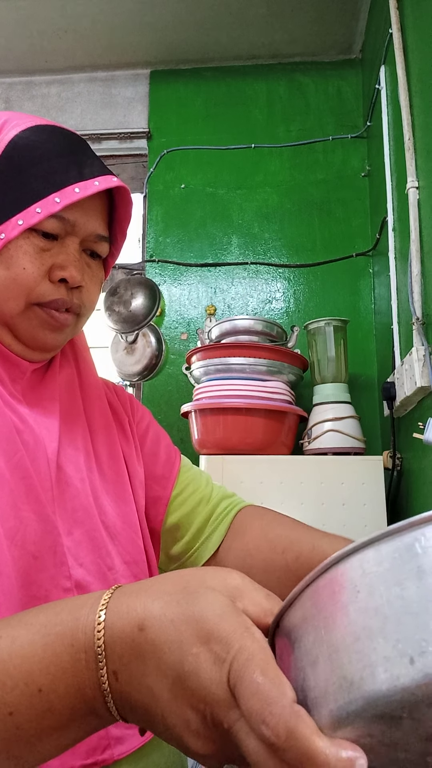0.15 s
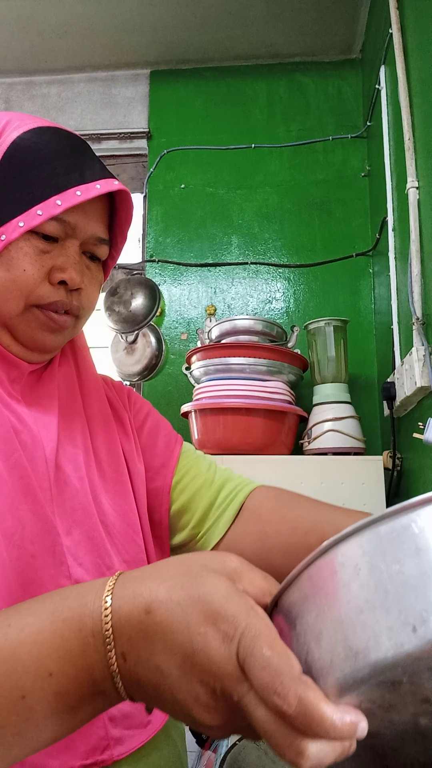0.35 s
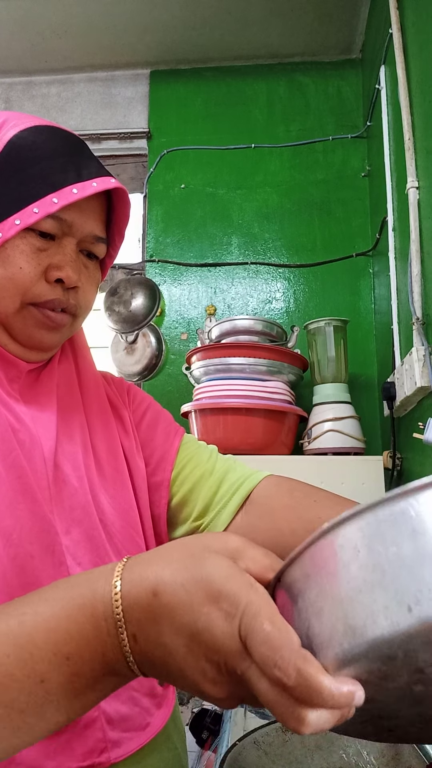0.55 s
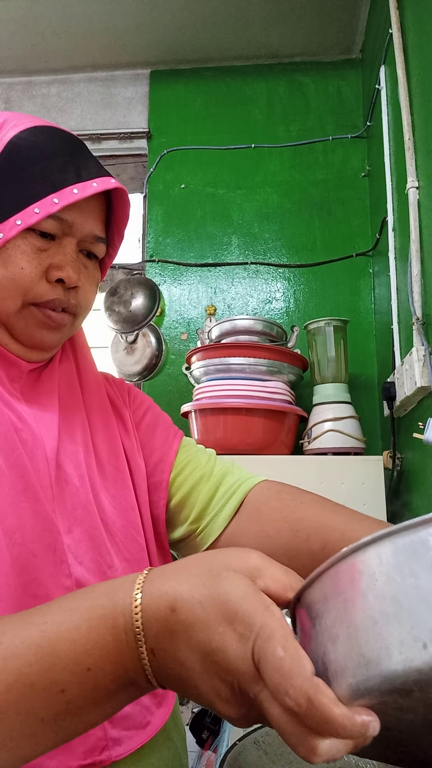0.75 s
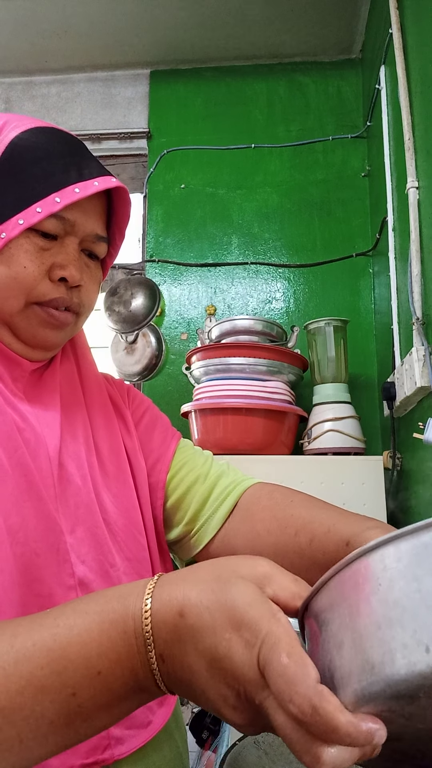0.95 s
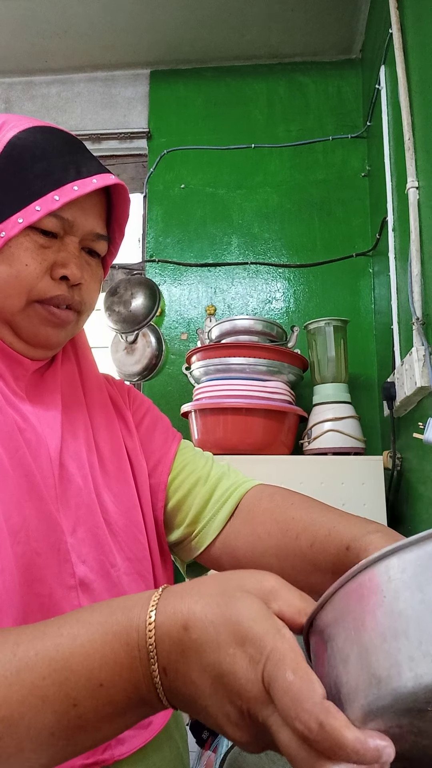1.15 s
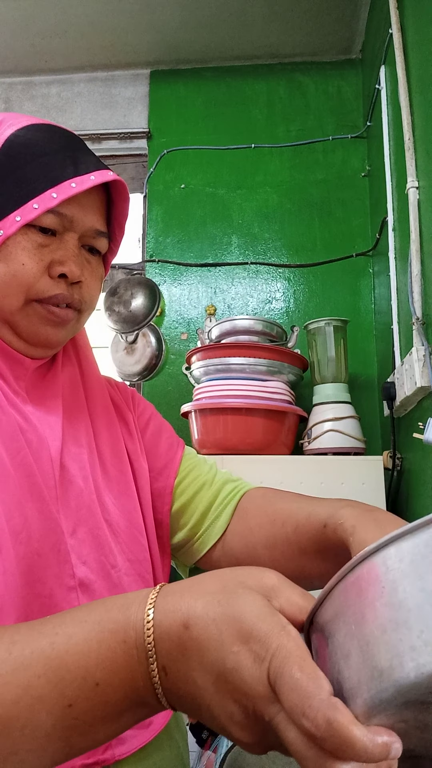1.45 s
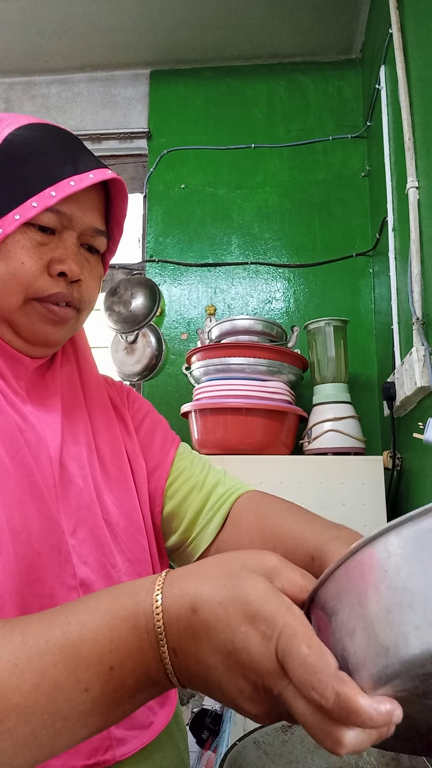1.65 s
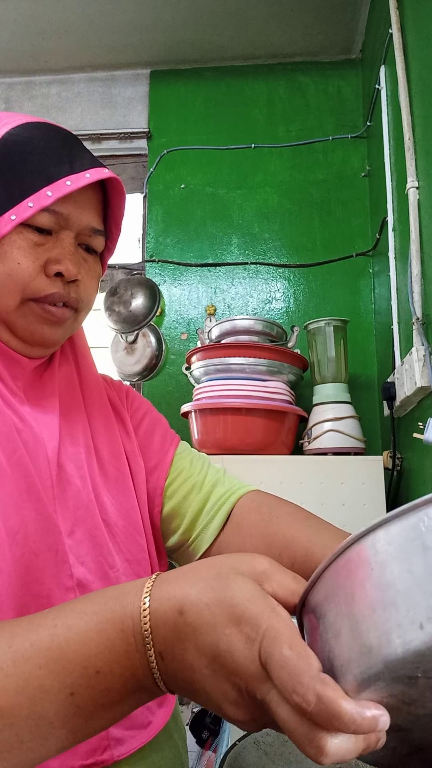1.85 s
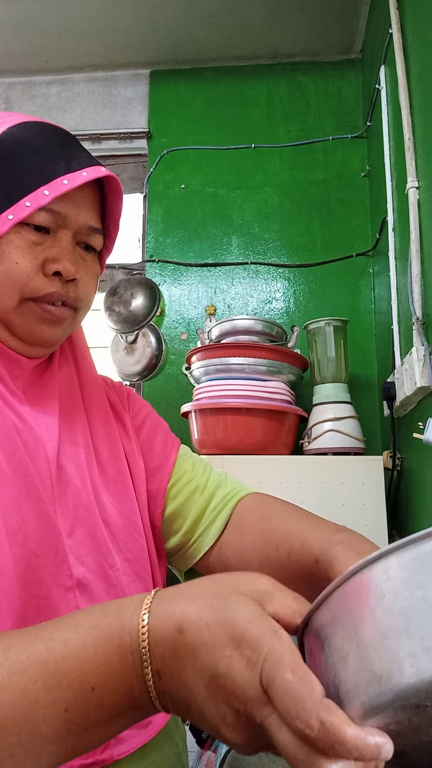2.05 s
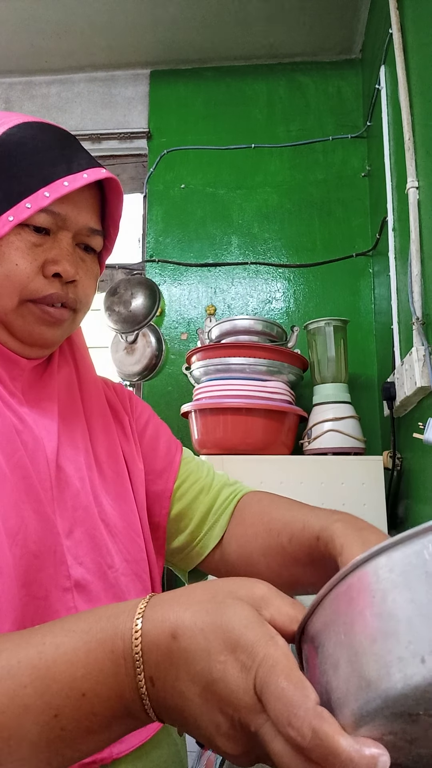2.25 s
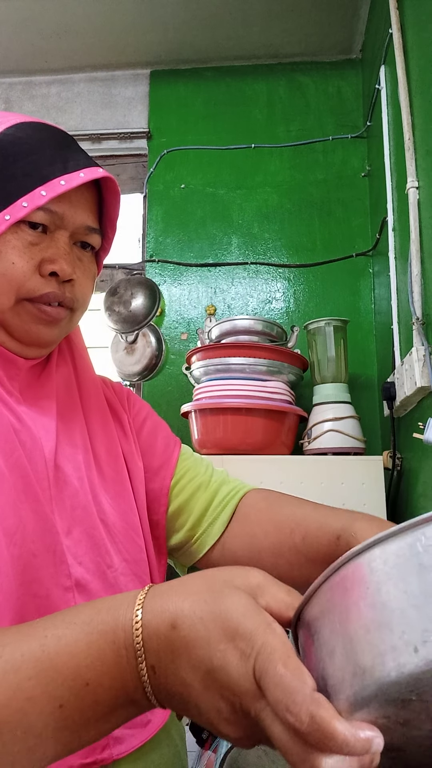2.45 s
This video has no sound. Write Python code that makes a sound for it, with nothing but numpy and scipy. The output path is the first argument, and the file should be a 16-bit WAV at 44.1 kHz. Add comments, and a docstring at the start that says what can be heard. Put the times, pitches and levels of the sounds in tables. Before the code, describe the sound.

Hard little shells rattle and grind against a thin metal bowl, stirred in strokes, indoors

```python
"""A hand stirs snail shells round a metal basin in a small, hard-walled kitchen, over a steady faint noise floor.
First shells tumble and click, with knocks on the wall, as a short stroke scrapes by; then it grows quiet.
From half a second on, the heap scrapes in strokes (gritty contacts) and sets the bottom droning (a narrow mode),
while shells tumble (noise bursts), click (cracks and hollow rings) and knock on the wall (basin modes).
Near the end the tumbling swells and the clicks crowd together, then the level falls."""
import sys
import numpy as np
from scipy import signal
from scipy.fft import rfft, irfft, next_fast_len
from scipy.io import wavfile
from scipy.ndimage import uniform_filter1d, map_coordinates

SR = 44100
rng = np.random.default_rng(int(sys.argv[2]) if len(sys.argv) > 2 else 0)


def wav_record(signal):
    """Record a signal, one row per channel, as 16-bit PCM in the file named by sys.argv[1]."""
    frames = np.transpose(np.atleast_2d(signal))
    bounded = np.clip(frames, -1, 1)
    # unit amplitude maps onto the largest positive 16-bit level
    quanta = np.round(bounded * 32767).astype(np.int16)
    wavfile.write(sys.argv[1], SR, quanta)


N = 114660
T = np.arange(N) / SR


def amp(db):
    """Decibel law: a level as an amplitude ratio."""
    return 10 ** (np.asarray(db) / 20)


def unit(x):
    """Normalisation: scale to an rms of 1."""
    return x / np.sqrt(np.mean(x ** 2) + 1e-20)


def decay(t, t60):
    """Exponential decay: 60 dB lost in t60 seconds."""
    return amp(-60 * t / t60)


def along(points, hz):
    """Logarithmic frequency scale: interpolate (frequency [Hz], value) points."""
    f, v = np.transpose(points)
    return np.interp(np.log(hz + 1), np.log(f + 1), v)


def level(rows):
    """Amplitude envelope: gain per sample from (time [s], level [dB]) rows."""
    return amp(np.interp(T, *np.transpose(rows)))


def wobble(rate):
    """Slow random modulation: a smooth curve with rate knots a second."""
    return map_coordinates(rng.standard_normal(4000), [T * rate], mode="wrap")


def filtered(x, response):
    """Linear filtering: multiply the spectrum by a response of frequency."""
    m = next_fast_len(N + SR // 2)
    return irfft(rfft(x, m) * response(np.fft.rfftfreq(m, 1 / SR)), m)[..., :N]


def coloured(x, points):
    """Minimum-phase filtering: colour x causally by (frequency [Hz], level [dB]) points, to rms 1."""
    def response(hz):
        cepstrum = irfft(np.log(amp(along(points, hz))))
        half = len(cepstrum) // 2
        cepstrum[1:half] *= 2  # fold negative times onto positive ones
        cepstrum[half + 1:] = 0
        return np.exp(rfft(cepstrum))
    return unit(filtered(x, response))


# likeness of the two channels: (frequency [Hz], correlation [0-1])
CHANNEL_LIKENESS = [(60, 1), (300, 1), (700, 0.2), (1300, 0.38), (2500, 0.028), (5000, 0.026),
                    (12000, 0.0073)]


def spread(pair):
    """Interchannel coherence: two unrelated signals become left and right, alike in the bass."""
    def mid_side_gains(hz):
        turn = np.arccos(np.clip(along(CHANNEL_LIKENESS, hz), -1, 1)) / 2
        return np.array([np.cos(turn), np.sin(turn)])
    mid, side = filtered(pair, mid_side_gains)
    return unit(np.array([mid + side, mid - side]))


def noise(points):
    """Random noise: coloured, stereo and of rms 1."""
    return spread(coloured(rng.standard_normal((2, N)), points))


def excerpt(sound, length):
    """Stationarity: a stretch of steady noise from a random moment."""
    return np.roll(sound, rng.integers(N), axis=1)[:, :length]


def add(out, s, x):
    """Superposition: mix x into out at time s."""
    i = max(0, round(s * SR))
    out[:, i:i + x.shape[-1]] += x[..., :max(0, N - i)]


def contacts(per_s, scatter_db, t60):
    """Random impact process: tiny gritty contacts at random moments, of clipped log-normal size."""
    size = amp(scatter_db * np.clip(rng.standard_normal(N), -2, 1.7))
    hits = (rng.random(N) < per_s / SR) * size
    energy = signal.lfilter([1], [1, -amp(-120 / (t60 * SR))], hits ** 2)
    return np.sqrt(energy) * rng.standard_normal((2, N))


# strength of the stirring: (time [s], level [dB])
STIRRING = [(0, -43.5), (.06, -47), (.1, -38.5), (.17, -29.5), (.245, -39), (.46, -50), (.51, -40.5),
            (.565, -31), (.66, -29), (.76, -34), (.84, -30.5), (.895, -33.5), (.918, -44.5), (.955, -33),
            (1.2, -30), (1.29, -32.5), (1.325, -37.5), (1.42, -38), (1.5, -32.5), (1.6, -38.5), (1.65, -32),
            (1.725, -37), (1.755, -26), (1.85, -27), (1.93, -38.5), (2.02, -34.5), (2.08, -29),
            (2.16, -31.5), (2.215, -38), (2.25, -33), (2.37, -32.5), (2.47, -34.5), (2.6, -41.5)]
# colour of the scraping: (frequency [Hz], level [dB])
SCRAPE_COLOUR = [(220, -24), (380, -20), (579, -6.5), (687, -2), (939, -7.5), (1220, -14), (1500, -3.5),
                 (1700, 1), (2930, -2.5), (3220, -5), (5910, 0.5), (6600, -6.5), (8340, -17.5),
                 (11700, -12), (15800, -31)]
SCRAPES_PER_S, SCRAPE_T60_S, SCRAPE_SCATTER_DB = 2400, .0025, 5
CLUMP_DB, CLUMP_KNOTS_PER_S = 1.5, 70
GRIT_DB, SING_DB, TAP_DB = 2, -2, -2.5  # shares of the scraping


def scraping():
    """Friction as many small impacts: the heap slides in clumps, shells tap and the basin sings along."""
    clumps = amp(CLUMP_DB * wobble(CLUMP_KNOTS_PER_S))
    force = spread(contacts(SCRAPES_PER_S, SCRAPE_SCATTER_DB, SCRAPE_T60_S) * clumps)
    bass_cut = lambda hz: 1 / (1 + (260 / (hz + 1)) ** 4)
    grit = filtered(coloured(force, SCRAPE_COLOUR), bass_cut)
    return level(STIRRING) * (amp(GRIT_DB) * grit + amp(SING_DB) * basin(force) + amp(TAP_DB) * taps())


# modes of the loaded basin, also rung by the knocks: (frequency [Hz], level [dB], t60 [s])
BASIN_MODES = [(530, -9.5, .15), (697, -18, 0.23), (1230, 1.5, 0.07), (1282, -5.5, 0.14), (1412, 5, 0.017),
               (1661, -2, 0.12), (1728, -1, 0.044), (1838, -12, 0.21), (2113, -6.5, .15),
               (3645, -2.5, 0.057), (6350, 8.5, 0.05), (6800, 6.5, 0.043)]


def basin(force):
    """Modal resonance: the basin's modes answer a force, each a damped oscillator."""
    def response(f):
        total = 0
        for hz, db, t60 in BASIN_MODES:
            width_hz = np.log(1000) / np.pi / t60
            total = total + amp(db) * np.sqrt(t60) * 1j * f / t60 / (hz * hz - f * f + 1j * f * width_hz)
        return total
    return unit(filtered(force, response))


# colour of the small taps: (frequency [Hz], level [dB])
TAP_COLOUR = [(100, -41), (300, -20), (700, -9.5), (1250, 4), (2000, -4.5), (3000, 3.5), (5000, 2.5),
              (6700, 8.5), (7700, -27), (12000, 1)]
TAPS_PER_S, TAP_HZ, TAP_OCTAVES = 520, 3243, 1.75  # centre pitch, spread to either side
TAP_CYCLES = 48  # cycles for a tap to fall by 60 dB


def taps():
    """Constant-Q decay: single shells tap as they roll, each dying in the same number of cycles."""
    count, t = int(TAPS_PER_S * N / SR), T[:900]
    u = rng.random((count, 4))
    hz = np.clip(TAP_HZ * 2 ** (TAP_OCTAVES * (2 * u[:, :1] - 1)), 300, 15000)
    size = amp(4.5 * np.minimum(-np.log(1 - u[:, 1:2]), 2.6))
    fade = size * decay(t * hz, TAP_CYCLES) * np.sqrt(hz)
    at = (u[:, 2:3] * N).astype(int) + np.arange(len(t))
    lag = (u[:, 3:] - .5) * .0004  # s, opposite in the two channels
    channels = []
    for side in (1, -1):
        tones = fade * np.sin(2 * np.pi * hz * (t + side * lag))
        channels.append(np.bincount(at.ravel(), tones.ravel(), N)[:N])
    return coloured(np.array(channels), TAP_COLOUR)


# ring of the basin's bottom under the heap: (time [s], level [dB])
BOTTOM_RING = [(.5, -69), (.6, -39), (.76, -39.5), (.87, -46), (.96, -43), (1.12, -45.5), (1.2, -38.5),
               (1.3, -38), (1.35, -47), (1.45, -40.5), (1.53, -49.5), (1.71, -60), (1.84, -37.5),
               (1.89, -45.5), (2.11, -37), (2.23, -34.5), (2.31, -48), (2.37, -36), (2.44, -53.5),
               (2.6, -59)]
DRONE_HZ, DRONE_WIDTH_HZ, DRONE_DB = 292.2, 7.4, -2


def drone():
    """Narrow-band resonance: rubbing feeds the lowest mode of the bottom; its swells are evened out."""
    def response(f):
        mode = 1j * f * DRONE_WIDTH_HZ / (DRONE_HZ ** 2 - f * f + 1j * f * DRONE_WIDTH_HZ)
        return mode / (1 + (f / 600) ** 4)
    ring = filtered(rng.standard_normal(N), response)
    power = np.abs(uniform_filter1d(ring ** 2, size=2200))  # mean over 50 ms
    steady = ring / np.sqrt(power + 1e-12)
    return amp(DRONE_DB) * level(BOTTOM_RING) * steady


# shells tumbling over each other: (time [s], level [dB])
TUMBLING = [(0, -41), (.06, -73), (.12, -44), (.135, -26.5), (.19, -26.5), (.24, -49), (.45, -68),
            (.6, -35), (.92, -45), (1.1, -31.5), (1.32, -38), (1.36, -30.5), (1.42, -26.5), (1.56, -28.5),
            (1.7, -36.5), (1.8, -28.5), (1.94, -44), (2.14, -28), (2.22, -31), (2.33, -21.5), (2.39, -23),
            (2.44, -48), (2.6, -33)]
# colour of tumbling shells: (frequency [Hz], level [dB])
RATTLE_COLOUR = [(100, -68), (500, -31), (1500, -14), (2800, -8), (3700, -7.5), (5500, -7), (6900, 0),
                 (7700, -18.5), (9500, -10.5), (12500, -12), (15800, -12.5)]


def tumbling():
    """Random impact process: loose shells rattle on each other."""
    rattle = contacts(per_s=400, scatter_db=4, t60=.009)
    return level(TUMBLING) * coloured(spread(rattle), RATTLE_COLOUR)


# shell on shell: (time [s], level [dB], pitch [Hz], treble [dB])
SHELL_CLICKS = [(.002, -27, 4250, -7.5), (.071, -19.5, 4360, 5), (.0813, -23.5, 4200, 5),
                (.1045, -26, 4200, 8), (.125, -9, 3640, 7.5), (.137, -20, 3670, -8), (.157, -18, 3800, -7),
                (.179, -16, 6900, 1.5), (.2603, -13, 4310, -6), (.2622, -15, 4810, -9.5),
                (0.271, -26, 3900, -6), (.302, -24, 3700, -3), (.289, -20, 3740, 8), (.485, -32.5, 5520, 3),
                (.497, -32.5, 6440, -10.5), (.51, -34, 6360, 10), (.534, -32, 6340, 6),
                (.635, -23.5, 6730, -2), (.789, -27, 6300, -2), (.819, -22, 6400, 5), (.949, -29, 5660, 2),
                (1.002, -22, 5360, 5), (1.033, -32, 6600, 1), (1.088, -22, 5400, 9.5),
                (1.15, -20.5, 5730, -1.5), (1.3312, -20, 6100, -0.5), (1.358, -16.5, 5160, -3.5),
                (1.394, -24.5, 5500, 6), (1.373, -23, 5270, -2), (1.419, -22.5, 4300, -6),
                (1.4344, -9.5, 6520, 2), (1.476, -17, 5400, 10), (1.506, -25.5, 6960, 15.5),
                (1.5475, -16, 4500, 8), (1.579, -22, 6940, 9), (1.609, -11, 4650, -4.5),
                (1.641, -18, 4680, 4), (1.785, -18.5, 6660, 2), (1.842, -18, 6080, -2),
                (2.057, -19.5, 5400, 1), (2.1505, -16, 6410, 2), (2.1952, -13, 5800, 2.5),
                (2.257, -14.5, 6590, 3.5), (2.313, -9, 5950, 1), (2.336, -13, 6630, 4),
                (2.348, -14, 6000, 6), (2.368, -14, 4220, 0), (2.396, -15, 6550, 4),
                (2.425, -12, 4790, -4.5), (2.4338, -11.5, 4740, -1.5), (2.473, -29, 6150, 11.5),
                (2.5132, -12, 4230, 3.5), (2.519, -13, 4500, 4)]
# modes of a shell: (ratio to the pitch, level [dB])
SHELL_PARTIALS = [(0.832, -8), (0.996, -1.5), (1.098, -7.5)]
# crack of a click: (frequency [Hz], level [dB])
CRACK_COLOUR = [(100, -54), (300, -36), (1300, -29), (3500, -2), (5000, 3.5), (6900, 4.5), (7700, -11),
                (16000, -47)]
# brittle top of a click: (frequency [Hz], level [dB])
SNAP_COLOUR = [(3000, -39), (6500, -13), (8000, -9), (11000, -0.5), (13000, 1.5), (16000, -9.5)]
# the basin's answer to a click: (frequency [Hz], level [dB])
ANSWER_COLOUR = [(2800, -74), (3300, 16), (3650, 21.5), (4100, 18), (4700, -3), (6000, -48), (6900, -19),
                 (7500, 0.5)]
RING_DB, CRACK_DB, SNAP_DB, ANSWER_DB = -2.5, -7, -14, -15
SHELL_T60_S, CRACK_T60_S, ANSWER_T60_S = 0.0053, 0.026, 0.14
SPIKE_DB, SPIKE_T60_S = 7.5, 0.00099  # first contact
HOLLOW = 0.94  # dB more ring for each dB less treble: whole shells ring, broken ones snap
CHATTER_S, CHATTER_HZ = 0.002, 4900  # chatter of a shell of this pitch; smaller shells chatter longer


def clicks():
    """Impact and free decay: shells chatter with crack, brittle top and hollow ring; the basin answers."""
    out, t = np.zeros((2, N)), T[:SR // 5]
    crack, snap, answer = noise(CRACK_COLOUR), noise(SNAP_COLOUR), noise(ANSWER_COLOUR)
    for s, db, hz, treble_db in SHELL_CLICKS:
        own = (round(s * SR) + np.arange(len(t))) % N
        free = np.maximum(t - CHATTER_S * (hz / CHATTER_HZ) ** 2, 0)  # decay waits for the chatter
        ring = 0
        for ratio, mode_db in SHELL_PARTIALS:
            mode_hz = hz * ratio * (1 + 0.021 * rng.standard_normal())
            ring = ring + amp(mode_db) * np.sin(2 * np.pi * (mode_hz * t + rng.random((2, 1))))
        ring = amp(RING_DB - HOLLOW * treble_db) * decay(free, SHELL_T60_S) * ring
        grit = amp(CRACK_DB) * crack[:, own] + amp(SNAP_DB + treble_db) * snap[:, own]
        grit = grit * (decay(free, CRACK_T60_S) + amp(SPIKE_DB) * decay(t, SPIKE_T60_S))
        tail = amp(ANSWER_DB) * decay(t, ANSWER_T60_S) * excerpt(answer, len(t))
        add(out, s, amp(db) * (grit + ring + tail))
    return out


# shells on the wall: (time [s], level [dB], pitch of the struck spot [Hz], ring of the whole basin [dB])
WALL_KNOCKS = [(0.081, -23.5, 1240, -5.5), (0.1566, -15, 1670, -10), (.164, -18, 1620, -15),
               (.177, -11, 1490, -10), (.2275, -24, 1670, -20), (.533, -20.5, 1220, -12),
               (0.654, -21.5, 1300, -10), (0.715, -26.5, 1270, -12), (0.774, -20, 1330, -4),
               (0.834, -22, 553, -5), (.841, -21, 1310, -9), (0.981, -21.5, 1670, -14),
               (1.031, -24, 1190, -14), (1.079, -19, 1210, -6), (1.191, -27, 1980, -20),
               (1.284, -20.5, 1170, -11), (1.361, -24, 1620, -7), (1.4345, -15.5, 1960, -15),
               (1.478, -20, 1670, -6), (1.497, -18.5, 1687, -7), (1.5065, -17.5, 1680, -7.5),
               (1.747, -15.5, 2170, -2), (1.785, -16, 1610, -17), (1.843, -21, 1700, -12),
               (2.08, -18, 1250, -10), (2.152, -14, 1250, -9.5), (2.172, -18, 2050, -13),
               (2.237, -19, 1640, -13), (2.335, -20.5, 1400, -18), (2.369, -18, 1310, -22),
               (2.473, -19.5, 1345, -24)]
# short ring of the struck spot: (ratio to the pitch, level [dB])
SPOT_PARTIALS = [(1, -1.5), (1.36, -7.5)]
# contact with the wall: (frequency [Hz], level [dB])
CLACK_COLOUR = [(100, -84), (500, -29), (1100, -10), (1500, -16), (2200, 3), (3200, -17.5), (8000, -30)]
SPOT_T60_S, CLACK_T60_S, CLACK_DB, KNOCK_ATTACK_S = 0.02, 0.012, -3, .0007
KNOCK_DETUNE, KNOCK_OCTAVES = .004, .2  # random detuning [ratio], reach of a knock among the modes


def knocks():
    """Local excitation of modes: the struck spot rings briefly and the basin's nearby modes ring on."""
    out, t = np.zeros((2, N)), T[:SR // 4]
    clack = noise(CLACK_COLOUR)

    def partial(hz):
        detuned = hz * (1 + KNOCK_DETUNE * rng.standard_normal())
        phase = rng.random() + 0.12 * rng.standard_normal((2, 1))  # cycles, nearly alike left and right
        return np.sin(2 * np.pi * (detuned * t + phase))

    for s, db, pitch, ring_db in WALL_KNOCKS:
        spot = sum(amp(mode_db) * partial(pitch * ratio) for ratio, mode_db in SPOT_PARTIALS)
        spot = decay(t, SPOT_T60_S) * spot
        ring = 0
        for hz, mode_db, t60 in BASIN_MODES:
            nearness = 1 / (1 + (np.log2(hz / pitch) / KNOCK_OCTAVES) ** 4)
            ring = ring + amp(mode_db) * decay(t, t60) * nearness * partial(hz)
        attack = 1 - np.exp(-t / KNOCK_ATTACK_S)
        contact = amp(CLACK_DB) * decay(t, CLACK_T60_S) * excerpt(clack, len(t))
        add(out, s, amp(db) * ((spot + amp(ring_db) * ring) * attack + contact))
    return out


# soft bumps of the basin: (time [s], level [dB], pitch [Hz], t60 [s])
BASIN_BUMPS = [(.124, -33.5, 74, .11), (1.094, -37, 78, .1), (1.6395, -19, 301, .13), (1.64, -29, 533, .09)]


def bumps():
    """Damped oscillation: the whole basin bumps softly in the hand."""
    out, t = np.zeros((2, N)), T[:SR // 4]
    for s, db, hz, t60 in BASIN_BUMPS:
        attack = 1 - np.exp(-t / 0.0063)
        add(out, s, amp(db) * decay(t, t60) * np.sin(2 * np.pi * hz * t) * attack)
    return out


# reverberation of the kitchen: (frequency [Hz], t60 [s])
ROOM_T60 = [(200, 0.2), (1500, 0.12), (4000, 0.24), (7000, 0.2), (14000, 0.24)]


def kitchen(x):
    """Reverberation: hard walls answer with a quick-rising tail, each band decaying at its own rate."""
    diffuse = spread(rng.standard_normal((2, N)))[:, :SR // 2]
    hz, t, bands = signal.stft(diffuse, SR, nperseg=256)
    tail = signal.istft(bands * decay(t, along(ROOM_T60, hz)[:, None]), SR, nperseg=256)[1]
    tail = tail * (1 - np.exp(-T[:tail.shape[1]] / 0.00068))
    return signal.fftconvolve(x, tail / np.linalg.norm(tail[0]), axes=1)[:, :N]


# steady noise floor: (frequency [Hz], level [dB])
FLOOR_COLOUR = [(200, -26.5), (400, -7), (750, -3), (1000, -15), (1600, -9.5), (4000, -14), (6700, -6),
                (8200, -21.5), (12000, -8)]
# steady low rumble: (frequency [Hz], level [dB])
RUMBLE_COLOUR = [(20, -48), (50, -4), (85, -6), (200, -6), (400, -7), (900, -48)]
FLOOR_DB, RUMBLE_DB = -39.5, -54


def background():
    """Stationary noise: a steady floor and a low rumble."""
    return amp(FLOOR_DB) * noise(FLOOR_COLOUR) + amp(RUMBLE_DB) * noise(RUMBLE_COLOUR)


HEAP_SEND_DB, HITS_SEND_DB = -8.5, -3  # into the reverberation


def scene():
    """Superposition: direct sound, reverberation, drone and background add."""
    heap = scraping() + tumbling()
    hits = clicks() + knocks() + bumps()
    wet = kitchen(amp(HEAP_SEND_DB) * heap + amp(HITS_SEND_DB) * hits)
    return heap + hits + wet + drone() + background()


# balance of the channels: (frequency [Hz], left over right [dB])
LEFT_OVER_RIGHT = [(110, -4.5), (300, -10.5), (700, -4), (1290, -4.5), (4400, 0.5), (8120, -4)]
TOP_HZ = 15850


def record(dry):
    """Band limiting and level difference: deepest bass and top are cut; the right leads in most bands."""
    def response(hz):
        bass_cut = 1 / (1 + (38 / (hz + 1)) ** 5)
        sides = amp(along(LEFT_OVER_RIGHT, hz) * np.array([[.5], [-.5]]))
        return sides * bass_cut * (hz < TOP_HZ)
    return filtered(dry, response)


dry = scene()
out = record(dry)
wav_record(out)
```